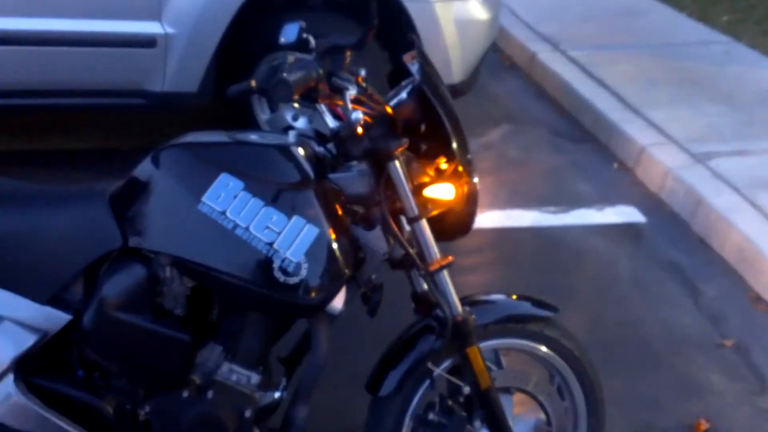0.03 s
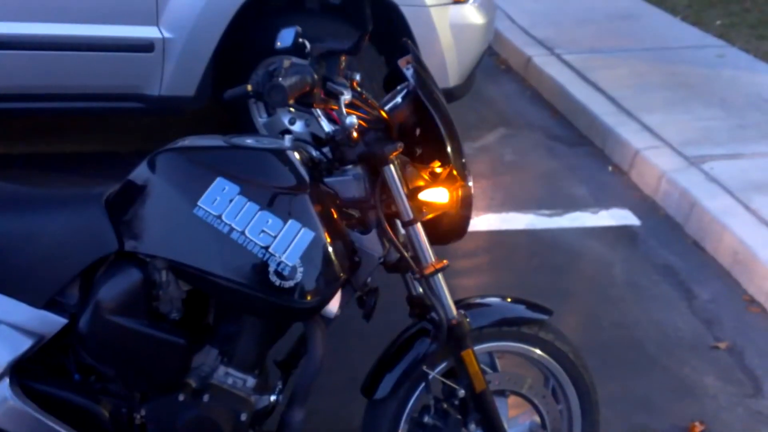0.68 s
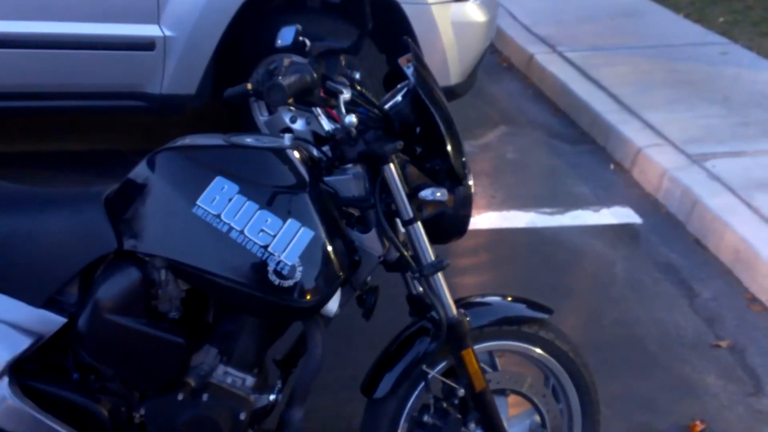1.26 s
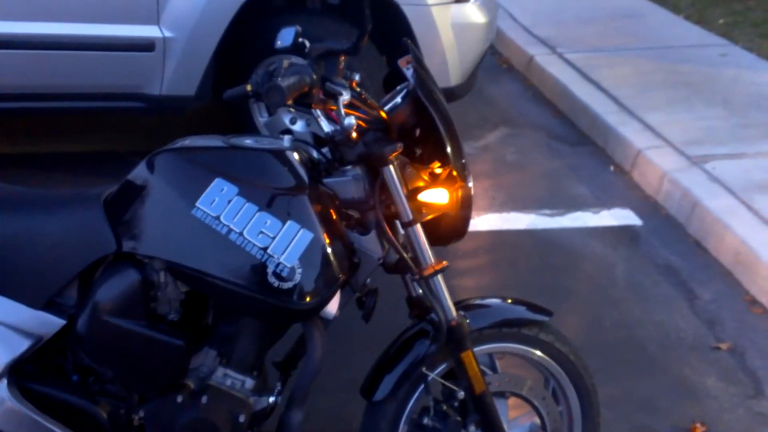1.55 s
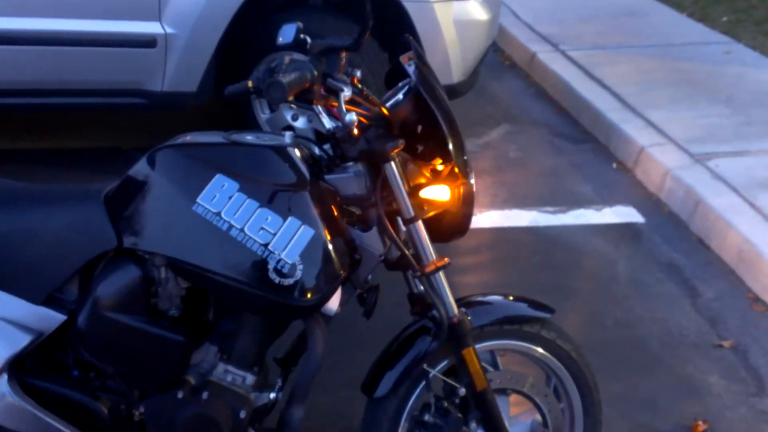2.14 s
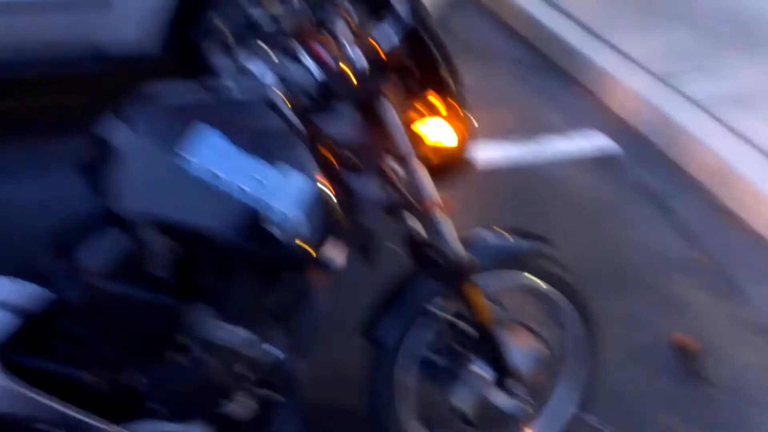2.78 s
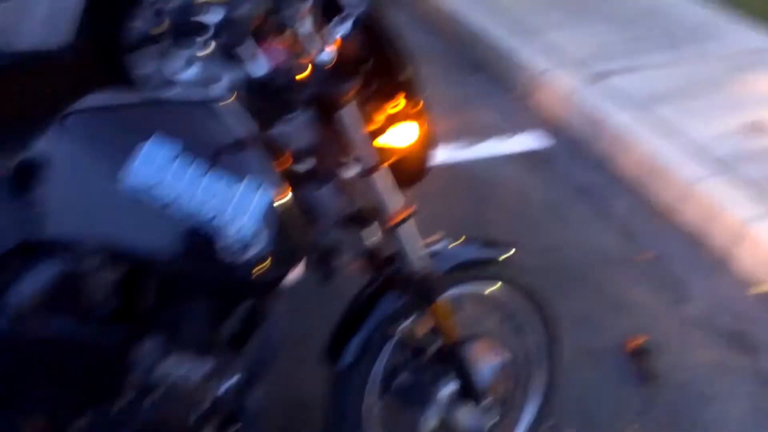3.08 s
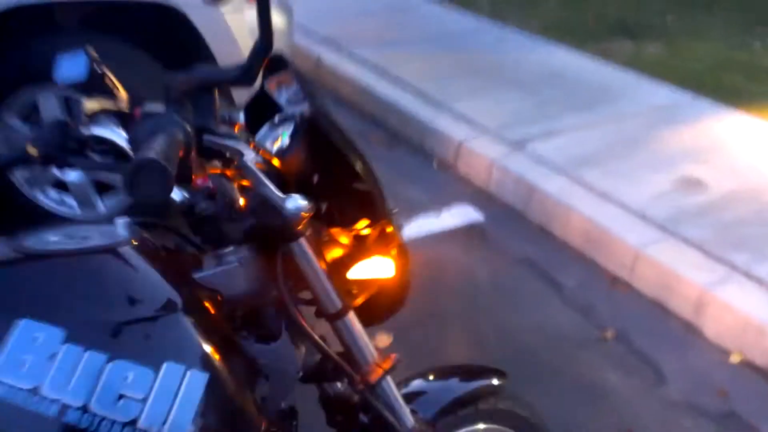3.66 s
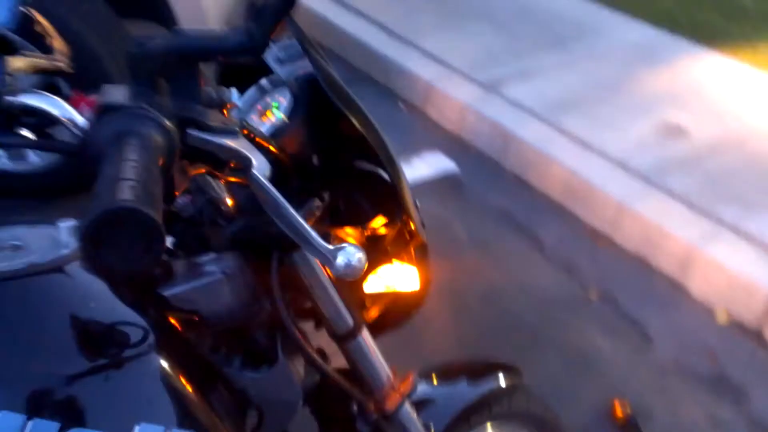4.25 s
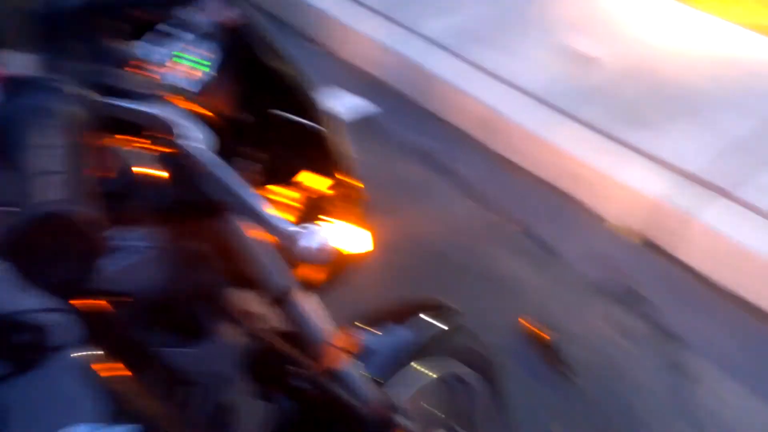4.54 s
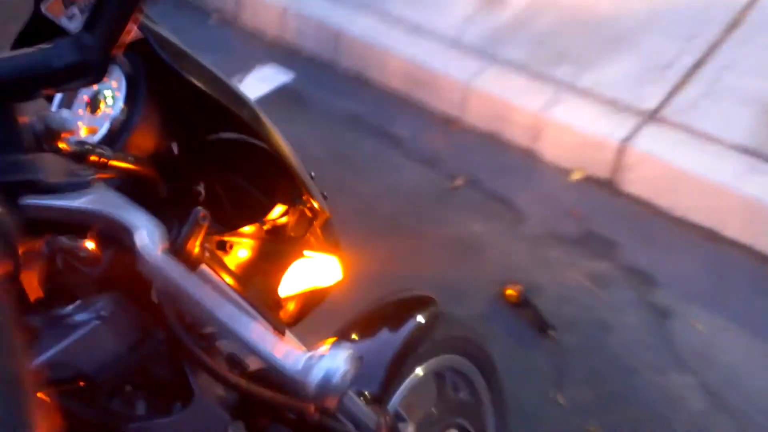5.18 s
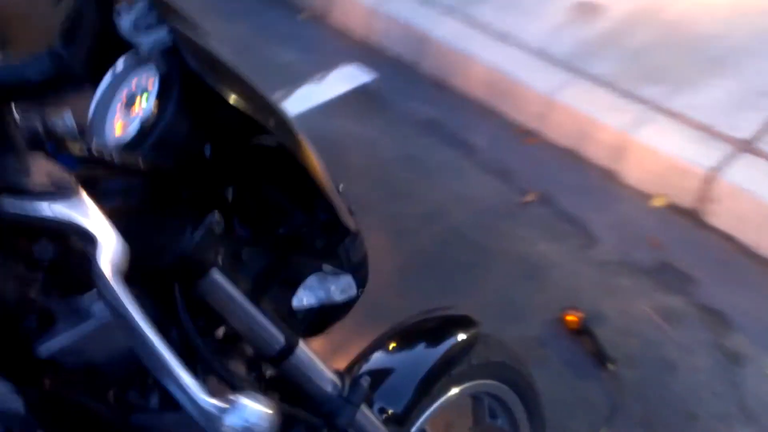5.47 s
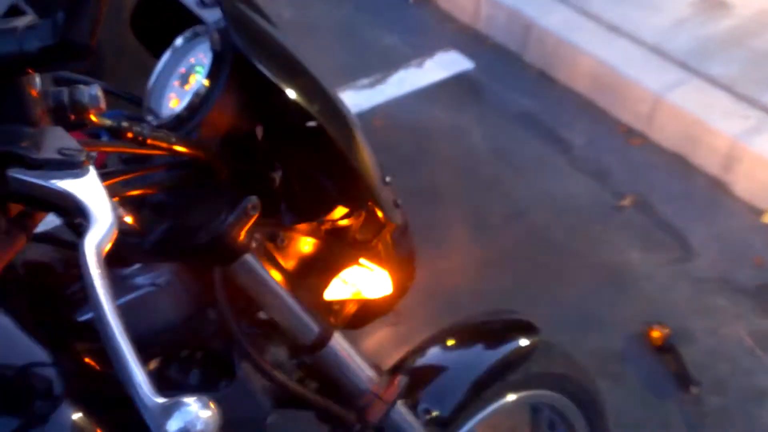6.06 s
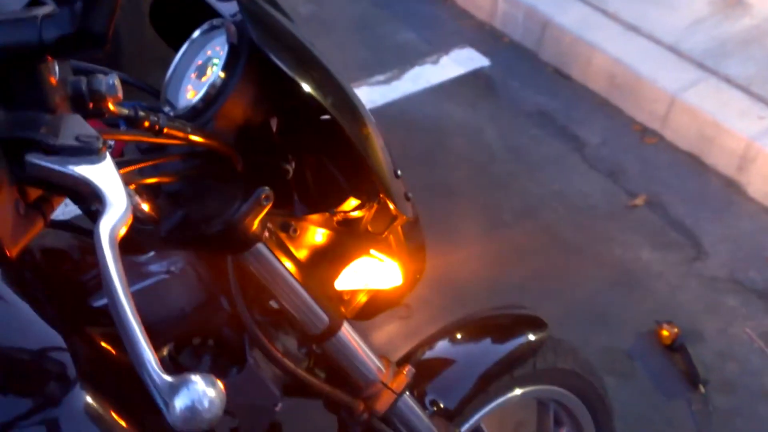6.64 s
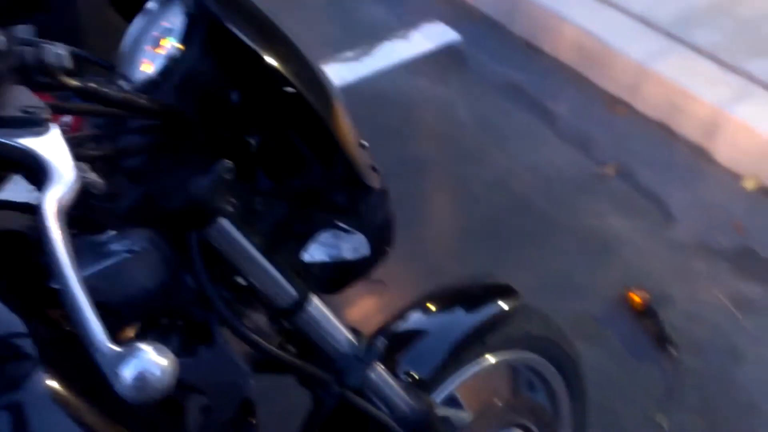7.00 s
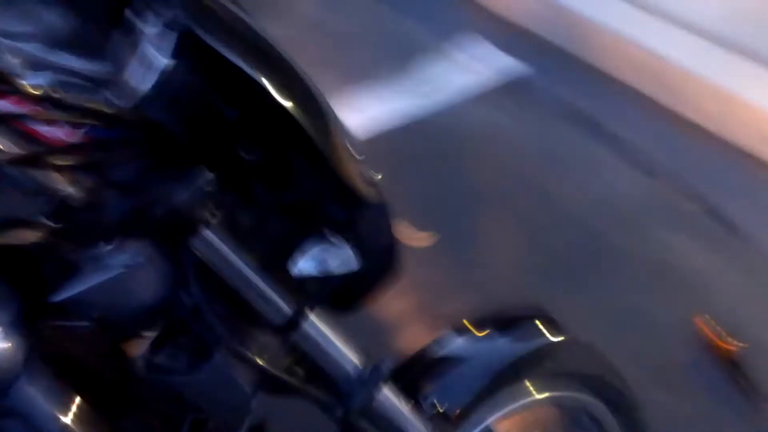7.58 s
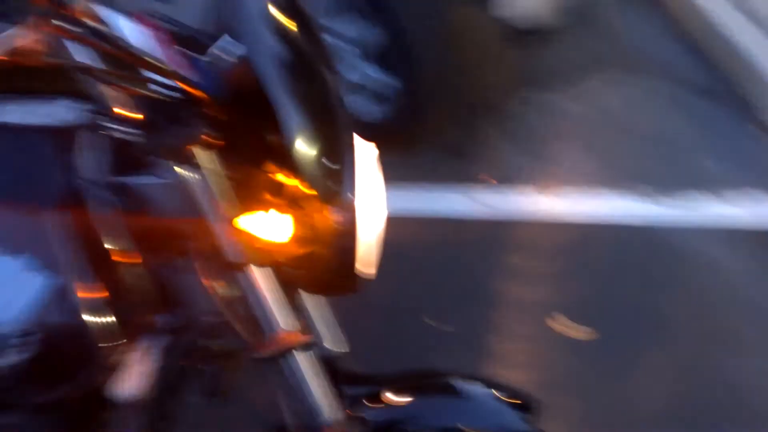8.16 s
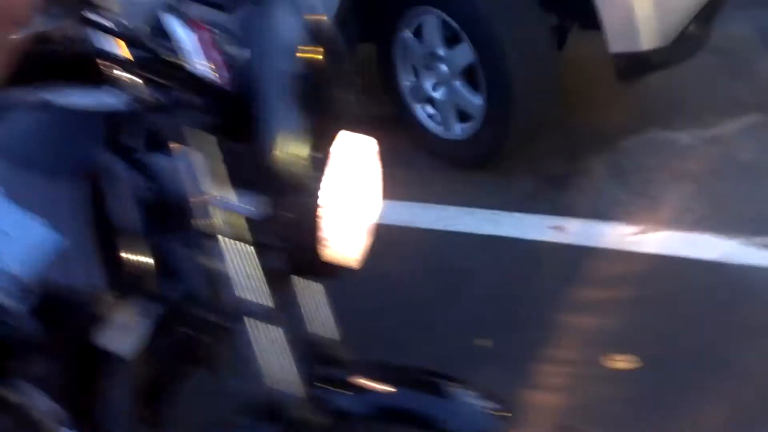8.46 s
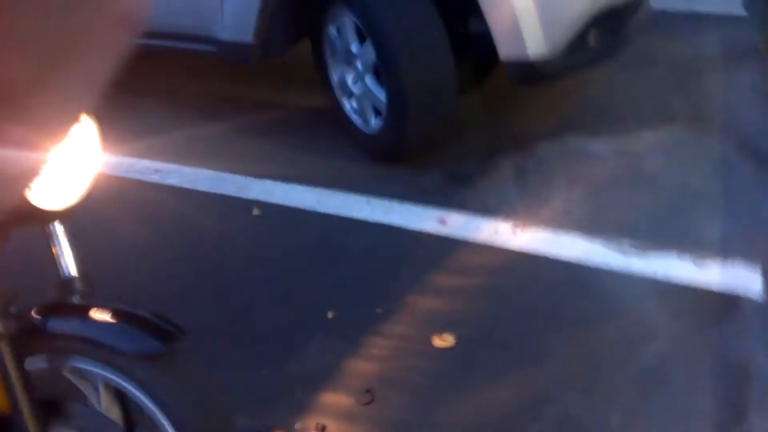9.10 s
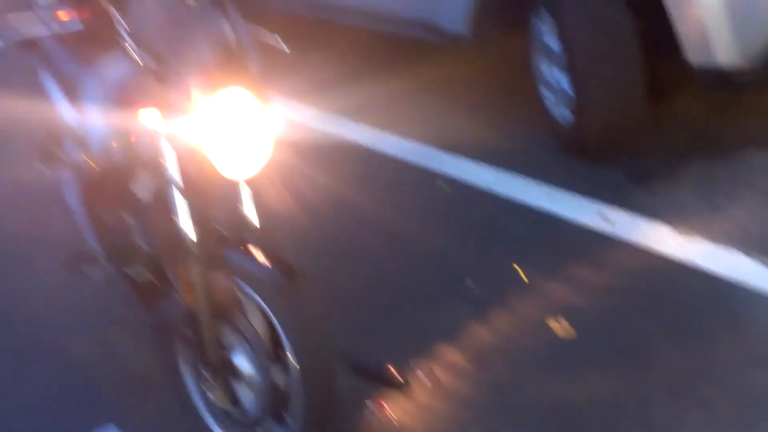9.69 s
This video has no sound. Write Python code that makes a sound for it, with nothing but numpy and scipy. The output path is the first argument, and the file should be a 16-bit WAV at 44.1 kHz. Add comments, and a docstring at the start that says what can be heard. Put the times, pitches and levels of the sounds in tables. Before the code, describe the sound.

A parked motorcycle's turn signal ticks faintly and evenly on a quiet street with distant traffic. Fingers suddenly rub and knock loudly on the hand-held microphone, then a small motor whirrs softly nearby with a rapid, scratchy ticking. The signal grows a little louder amid soft footfalls and a faint fan hum. More loud rubs and sharp knocks come near the end, as the ticking stops and the whirr sinks.

```python
"""A parked motorcycle's turn signal relay ticks in a quiet street, louder as the hand-held camera nears.
Right at the microphone, fingers rub and knock on the case, and its ports ring near 4 kHz.
Between two changes of grip a small motor whirrs close by, ticking and scraping once a turn, then sinks.
Soft footfalls, a scuff and a faint whine pass; behind it all are a fan's hum and far traffic."""
import sys
import numpy as np
from scipy import signal
from scipy.fft import rfft, irfft, next_fast_len
from scipy.io import wavfile
from scipy.ndimage import uniform_filter1d, minimum_filter1d

SR = 44100
rng = np.random.default_rng(int(sys.argv[2]) if len(sys.argv) > 2 else 0)


def dump(signal):
    """Clip the signal to [-1, 1] and save it as 16-bit WAV at the path in sys.argv[1]."""
    limited = np.clip(np.atleast_2d(signal).T, -1, 1)
    pcm = np.round(limited * 32767).astype(np.int16)
    wavfile.write(sys.argv[1], SR, pcm)


N = 437913
TIME = np.arange(N) / SR
PORT_HZ = 4050   # resonance of the microphone ports

# finger strokes on the camera: start_s, end_s, level_db, swell_db, pressure_db, hollow_db, pan_db
STROKES = [(2.458, 2.476, -23.5, 1, 3, -14, 11), (2.475, 2.549, -32.5, 5, 10, 2, 10),
           (2.533, 2.577, -27.5, -8, 4, 1.5, 10.5), (2.513, 2.774, -42.5, -8, 3.5, 0, 10),
           (2.714, 2.816, -33.5, 0, 3.5, 2, 9.5), (2.785, 2.922, -36.5, -1, -1.5, 2, 10.5),
           (2.857, 3.054, -49, -2, -4.5, -5, 11), (3.326, 3.384, -42.5, -17.5, 3, -19, -5.5),
           (4.64, 5.498, -65, 3, -10, 6, 6), (7.377, 7.55, -37.5, 9.5, 3, -22, 7.5),
           (7.466, 7.696, -29, 4.5, -6.5, -1.5, 10.5), (7.604, 7.636, -34.5, 10, -20, 5, 8),
           (7.682, 7.749, -46, -19, -8, -3, 8), (7.756, 7.889, -31, 10, -5, -1.5, 9.5),
           (8.072, 8.313, -30, 13, -3.5, -0.5, 10.5), (8.982, 9.024, -53, -23, 1, -24, -3),
           (9.495, 9.619, -47, 2.5, 8, -1, 10.5)]


def relay(flash_s, close_s, open_s, stop_s, crack_db, snap_s, tail_db, bounce_s):
    """The contact closes and opens once a flash: it cracks, bounces ring its case, bodywork scatters."""
    # the relay as the camera nears: time_s, level_db
    approach = [(0, -53), (4.3, -51.5), (8.4, -45.5)]
    # modes of its case: pitch_hz, t60_s, closing_db, opening_db
    case_modes = [(3000, 0.069, -20, 1), (3320, 0.051, -24, 1.5), (4420, 0.055, -9, -0.5),
                  (4930, 0.027, 5.5, -1), (5950, .022, 4, -13)]
    # crack of the contact: frequency_hz, density_db
    crack_spectrum = [(450, 18.5), (2000, -12), (4400, 3), (7500, -10)]
    out, crack = 0, noise(crack_spectrum, alike=0.66)
    for k, first_s in enumerate((close_s, open_s)):
        age = (TIME - first_s) % flash_s
        bounces = rng.standard_normal(N) * np.exp(-age / bounce_s) * np.sqrt(2 / (bounce_s * SR))
        case = sum(from_db(dbs[k]) * ring(bounces, hz, t60) for hz, t60, *dbs in case_modes)
        scatter = from_db(tail_db) * np.exp(-age / 0.22)
        out = out + case + from_db(crack_db[k]) * (np.exp(-age / snap_s) + scatter) * crack
    return from_db(in_time(approach)[0]) * (TIME < stop_s) * out


def rubs(grit_db, judder_db, land_share=0.2, lift_share=0.33):
    """Skin sticks and slips on the case: dull when pressing, bright when gliding, hollow over a port."""
    # skin sliding beside the ports, in three bands: frequency_hz, density_db
    bass = [(30, -26), (350, 7), (750, 7), (1100, 3.5), (1450, 5), (2400, 5.5)]
    middle = [(1600, 2.5), (2100, -6), (2900, 3), (3900, 5), (4600, 2), (5700, 0), (7500, -7.5)]
    treble = [(5500, 5.5), (6700, -22), (8000, -2.5), (9800, 1), (12000, -5.5), (15500, -7)]
    power = np.zeros((4, 2, N))   # middle, bass, treble, hollow ring
    for start, end, db, swell_db, press_db, hollow_db, pan_db in STROKES:
        span = slice(int(start * SR), int(end * SR))
        along = (TIME[span] - start) / (end - start)
        touch = np.clip(np.minimum(along / land_share, (1 - along) / lift_share), 0, 1)
        contact = np.sin(np.pi / 2 * touch) ** 2 * from_db(swell_db * (along - .5))
        colour = from_db(db + np.array([0, press_db - 8, -7 - 0.62 * press_db, hollow_db]))
        power[:, :, span] += (colour[:, None, None] * panned(pan_db) * contact) ** 2
    slips = [noise(middle, alike=0.54, grit_db=grit_db), noise(bass, alike=1.0, grit_db=1.6 * grit_db),
             noise(treble, alike=0.45, grit_db=grit_db), finger_gap()]
    return (np.sqrt(power) * slips).sum(axis=0) * from_db(judder_db * drift(57))


def finger_gap(half_width_hz=580, wander_hz=149.7):
    """A band of noise rings in the gap under a cupped finger and glides as the finger moves."""
    # resonance of the gap: time_s, pitch_hz
    glide = [(2.52, 3650), (2.62, 4282), (2.74, 3495), (5.4, 3650), (7.5, 4330)]
    phase = 2 * np.pi * np.cumsum(in_time(glide)[0] + wander_hz * drift(20)) / SR
    return sum(noise([(1, 0), (half_width_hz, 0)], alike=0.54) * wave(phase) for wave in (np.sin, np.cos))


def knocks(low_cut_hz, size=4096):
    """A knock is a pressure pulse, narrower when harder; it rings the struck panel, case and port."""
    # knocks on the camera: time_s, level_db, hardness_hz, case_db, panel_hz, port_db, pan_db
    hits = [(2.4745, -16, 3500, 2, 1700, -14, 2), (2.4912, 2, 5000, -19, 1520, 0, 8),
            (2.5401, -3, 7500, -3, 690, -6, 18), (3.3331, -13.5, 514, 23, 1280, -46, -12),
            (7.419, -31, 3460, -8, 1300, -32, 12), (7.448, -8, 5540, -1.5, 1520, -14, 11),
            (8.1030, -14, 8150, 9, 2960, 1, -7), (8.7995, -12.5, 12900, 6.5, 1050, -25, -8.5),
            (8.8327, -1, 6600, 2, 2610, 6, 5), (9.4193, -11, 1870, -12, 1000, -31.5, 11),
            (9.706, -21, 9000, -6.5, 1640, -55, 13), (9.75, -33, 1150, 20, 910, -58, -10)]
    # modes of the camera case: pitch_hz, level_db, t60_s
    case_modes = [(2840, -7.5, 0.0055), (5400, -11, 0.0022)]
    out, click = np.zeros((2, N + size)), signal.unit_impulse(size)
    case = sum(from_db(db) * ring(click, hz, t60) for hz, db, t60 in case_modes)
    for s, db, hard_hz, case_db, panel_hz, port_db, pan_db in hits:
        covered = any(start < s < end for start, end, *_ in STROKES)
        port_t60 = 0.0028 if covered else 0.0082   # a rubbing finger damps the port
        port = cut(ring(click, PORT_HZ, port_t60), PORT_HZ, "high", order=1)   # answers pressure change
        pulse = cut(cut(click, hard_hz, "low", order=4), low_cut_hz, "high")
        panel = from_db(-6) * ring(click, panel_hz, t60=0.005)
        shell = cut(case + panel, 800, "high")   # a small case radiates no bass
        shell = from_db(case_db) * cut(shell, hard_hz, "low", order=4)
        knock = from_db(db) * (pulse / np.abs(pulse).max() + shell) + from_db(port_db) * port
        at = round(s * SR)
        out[:, at:at + size] += through_port(knock, port_t60) * panned(pan_db)
    return out[:, :N]


def through_port(x, t60):
    """The port's air stores sound near its resonance and gives it back late, in a few beats."""
    r = from_db(-60 / (t60 * SR))
    poles = [1, -2 * r * np.cos(2 * np.pi * PORT_HZ / SR), r * r]
    for _ in range(3):
        x = signal.lfilter(poles[::-1], poles, x)   # all-pass
    return x


def motor(turns_hz, scrape_at_s, ping_hz):
    """A small motor close by: an even whirr, and once a turn a bright tick, a ping and a dying scrape."""
    # the motor starts to rise, is fully heard, starts to fade, has sunk: time_s
    run_s = [2.3, 3.4, 7.6, 8.5]
    # its scrape, tick and whirr: frequency_hz, density_db
    scrape_spectrum = [(1500, -31), (3600, -1.5), (4700, -7), (5500, 0), (6400, -10), (7800, -7),
                       (10600, -13.5), (12000, -20)]
    tick_spectrum = [(3700, 1), (7000, -7), (10600, -2), (11800, -21), (13300, 9), (14800, -10)]
    whirr_spectrum = [(700, 1), (1000, 8.5), (1180, -3), (1320, 6), (1500, -3), (1900, 4), (2700, -3.5),
                      (3700, 0.5), (4600, -0.5), (6500, -4.5), (12000, -15), (16000, -17)]
    age = (TIME - scrape_at_s) % (1 / turns_hz)
    touch = rms_one(np.exp(-age / 0.025) + 0.5 * np.exp(-age / 0.076))
    scrape = from_db(-7.5) * touch * noise(scrape_spectrum, alike=0.79)
    tick = from_db(-6.5) * np.exp(-age / 0.006) * noise(tick_spectrum, alike=0.37)
    ping = from_db(4.5) * np.exp(-np.abs(age - 0.0067) / 0.00089) * np.sin(2 * np.pi * ping_hz * age)
    whirr = from_db(-6) * noise(whirr_spectrum, alike=0.21) * panned(db=6.5)
    chatter = (tick + ping + scrape) * from_db(drift(4.7)) * panned(db=11.5)
    presence = np.interp(TIME, run_s, [0, 1, 1, 0.4])
    return from_db(-49.5) * presence * (whirr + presence * chatter)


def scuff(at_s, width_s):
    """Grit crunches in one rounded swell, as under a sole on asphalt."""
    # the crunch: frequency_hz, density_db
    spectrum = [(350, -6), (1100, 2), (1700, -9), (3350, -7.5), (4100, -15), (8000, -15)]
    crunch = swells([(at_s, -30.5)], width_s) * noise(spectrum, alike=0.64, grit_db=2.5)
    return cut(crunch, 5600, "low")


def steps(width_s):
    """Footfalls reach the camera through the arm as dull thuds."""
    # soft footfalls: time_s, level_db
    footfalls = [(3.5, -50.5), (6.9, -45), (7.44, -46.5)]
    # their thud: frequency_hz, density_db
    spectrum = [(25, -24), (70, -23), (125, 1), (300, 2)]
    return noise(spectrum, alike=0.77) * swells(footfalls, width_s)


def rustles(width_s):
    """Light brushes against the camera give a thin airy hiss."""
    # brushes: time_s, level_db
    brushes = [(9.045, -54.5), (9.728, -52.5), (9.865, -55.5)]
    # their hiss: frequency_hz, density_db
    spectrum = [(3000, -2), (15500, -3)]
    return noise(spectrum, alike=0.5) * panned(db=3) * swells(brushes, width_s)


def whine(hz, width_s):
    """A faint breathy whine swells and fades."""
    # crests of the whine: time_s, level_db
    crests = [(4.95, -60.5), (9.65, -54.5)]
    return swells(crests, width_s) * drift(90) * np.sqrt(2) * np.cos(2 * np.pi * hz * TIME)


def fan(approach_db_per_s):
    """A fan's hum swells as the camera is carried into it, above the steady low drone of its motor."""
    # the hum along the walk: time_s, relative_db
    walk = [(3.6, -61.5), (4.43, -49.5), (4.53, -53), (6.21, -44.5), (6.42, -48.5), (7.41, -50.5),
            (8.38, -44), (9.93, -62)]
    # tones of the fan: pitch_hz, relative_db
    fan_tones = [(354, -3.5), (319, -11)]
    # tones of the drone: pitch_hz, level_db
    drone_tones = [(117.8, -70.5), (259, -64.5)]
    blades = sum(from_db(db) * far_hum(hz, waver=0.71) for hz, db in fan_tones)
    drone = sum(from_db(db) * far_hum(hz, waver=0.82) for hz, db in drone_tones)
    still_to_walk_s = np.maximum(walk[0][0] - TIME, 0)
    level_db = in_time(walk)[0] + 3 - approach_db_per_s * still_to_walk_s
    return from_db(level_db) * blades * panned(db=2.5) + drone


def far_hum(hz, waver):
    """A tone reaches the microphone by many paths, so its level and phase waver."""
    paths = 1 + waver * (drift(17.6) + 1j * drift(4.3))
    return np.sqrt(2) * np.real(paths * np.exp(2j * np.pi * hz * TIME)) / np.sqrt(1 + 2 * waver ** 2)


def street():
    """Far traffic rumbles and its tyres rush, under a faint even hiss."""
    # relative rise and fall of the traffic: time_s, rumble_db, tyre_db
    traffic = [(0.0, -65.5, -58), (2.79, -59.5, -52), (2.9, -63.5, -53), (3.59, -62, -62),
               (9.93, -59.5, -47)]
    # rumble, tyres and hiss: frequency_hz, density_db
    rumble_spectrum = [(35, -26), (60, -25), (85, -45), (115, -6.5), (260, 2), (400, 0), (600, -6.5),
                       (1200, -46)]
    tyre_spectrum = [(200, -19), (420, -28), (600, 4), (800, 5), (1100, -4), (1500, -11), (2500, -14),
                     (6000, -21)]
    hiss_spectrum = [(500, 3.5), (1600, 0.5), (2800, 6.5), (3450, 1.5), (4650, 4.5), (6500, -7.5),
                     (12000, -9), (13800, -6.5), (16000, -12)]
    rumble_db, tyre_db = in_time(traffic)
    rumble = from_db(rumble_db + 8 + drift(5.2)) * noise(rumble_spectrum, alike=0.97)
    tyres = from_db(tyre_db - 5 + drift(1.35)) * noise(tyre_spectrum, alike=0.56)
    hiss = from_db(-61.5) * noise(hiss_spectrum, alike=0.29) * panned(db=-0.5)
    return rumble + tyres + hiss


def from_db(db):
    """Decibels to gain."""
    return 10 ** (np.asarray(db) / 20)


def rms_one(x):
    """Scale to rms 1."""
    return x / np.sqrt(np.mean(x ** 2) + 1e-20)


def in_time(rows):
    """Each column of a timed curve, at every sample."""
    s, *columns = np.transpose(rows)
    return [np.interp(TIME, s, c) for c in columns]


def swells(rows, width_s):
    """A bell-shaped envelope for each row of time_s, level_db."""
    return sum(from_db(db) * np.exp(-((TIME - s) / width_s) ** 2) for s, db in rows)


def panned(db):
    """Stereo gains with mean 1, the left higher by db."""
    gains = from_db(np.array([[db], [-db]]) / 2)
    return gains / gains.mean()


def drift(rate_hz):
    """A smooth random wander with spread 1."""
    hop, settle = 40, 2000
    r = np.exp(-2 * np.pi * hop * rate_hz / SR)
    slow = signal.lfilter([1], [1, -2 * r, r * r], rng.standard_normal(N // hop + settle + 2))[settle:]
    return np.interp(np.arange(N) / hop, np.arange(len(slow)), rms_one(slow))


def noise(spectrum, alike, grit_db=0):
    """Stereo noise of a given spectral shape and left-right likeness; grit breaks it into grains."""
    n = next_fast_len(N)
    white = rng.standard_normal((2, n))
    if grit_db:
        white *= from_db(grit_db * np.minimum(rng.exponential(1, n), 6))
    hz, db = np.transpose(spectrum)
    log_hz = np.log(np.maximum(np.arange(n // 2 + 1) * SR / n, 1))
    outside = np.abs(log_hz - np.clip(log_hz, np.log(hz[0]), np.log(hz[-1])))
    colour = from_db(np.interp(log_hz, np.log(hz), db) - 40 * outside)
    mid, side = irfft(rfft(white) * colour, n)[:, :N]
    alike = np.clip(alike, 0, .999)
    return rms_one(mid) + np.sqrt((1 - alike) / (1 + alike)) * rms_one(side) * [[1], [-1]]


def ring(clicks, hz, t60):
    """Each click sets a decaying sine ringing."""
    r, w = from_db(-60 / (t60 * SR)), 2 * np.pi * hz / SR
    return signal.lfilter([0, np.sin(w)], [1, -2 * r * np.cos(w), r * r], clicks + 1e-18)


def cut(x, hz, kind, order=2):
    """Butterworth low-pass or high-pass."""
    return signal.sosfilt(signal.butter(order, min(hz, .45 * SR), kind, fs=SR, output="sos"), x)


def scene():
    """Relay and street in front, motor and fingers right at the microphone."""
    ticks = relay(flash_s=0.7218, close_s=0.643, open_s=0.3005, stop_s=8.4,
                  crack_db=(0, 6), snap_s=0.0066, tail_db=-15.5, bounce_s=0.0094)
    ticks = cut(ticks, 260, "high") * panned(db=2)
    handling = rubs(grit_db=3, judder_db=1.24) + rustles(width_s=0.027) + knocks(low_cut_hz=243)
    feet = steps(width_s=0.062) + scuff(at_s=5.06, width_s=0.023)
    hums = fan(approach_db_per_s=7) + whine(hz=1276, width_s=0.27)
    whirr = motor(turns_hz=18.638, scrape_at_s=3.121, ping_hz=5590)
    return ticks + handling + whirr + feet + hums + street()


def record(dry):
    """The camera limits each channel fast; lopsided overload leaves a low thump; the top is cut."""
    safe_gain = np.minimum(1, .9 / (np.abs(dry) + 1e-9))
    held = dry * uniform_filter1d(minimum_filter1d(safe_gain, size=25), size=25)
    thump = from_db(-22) * cut(cut(held ** 2, 150, "low"), 15, "high")
    top_cut = signal.ellip(10, .1, 80, 15800, fs=SR, output="sos")
    return signal.sosfilt(top_cut, held + thump)


dry = scene()
out = record(dry)
dump(out)
```